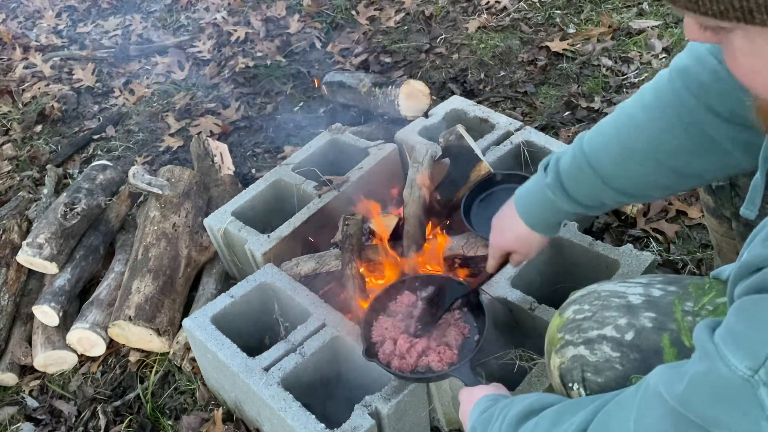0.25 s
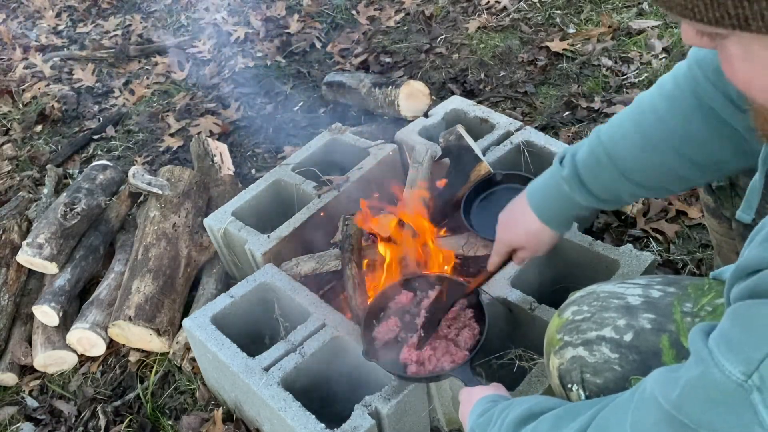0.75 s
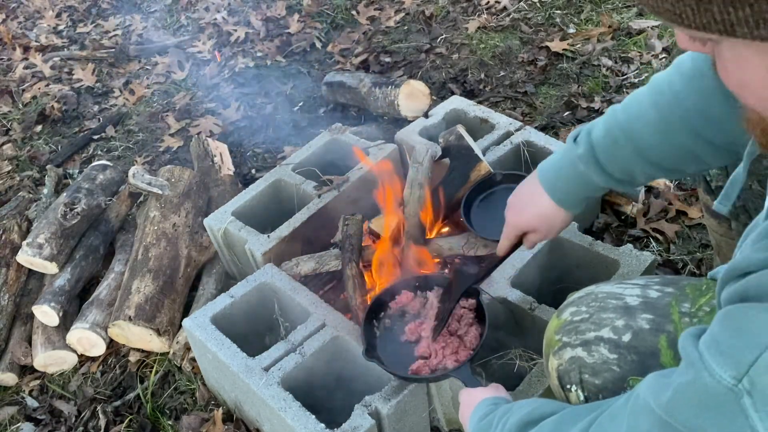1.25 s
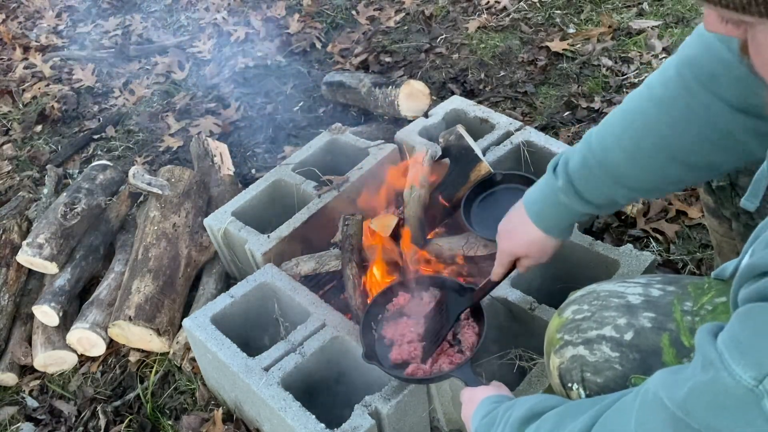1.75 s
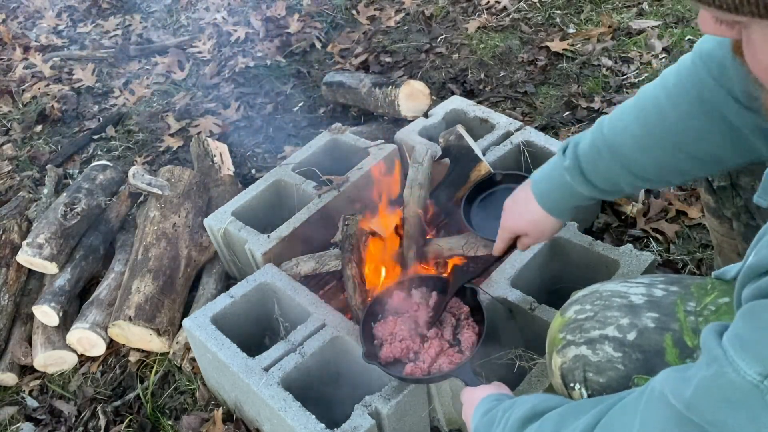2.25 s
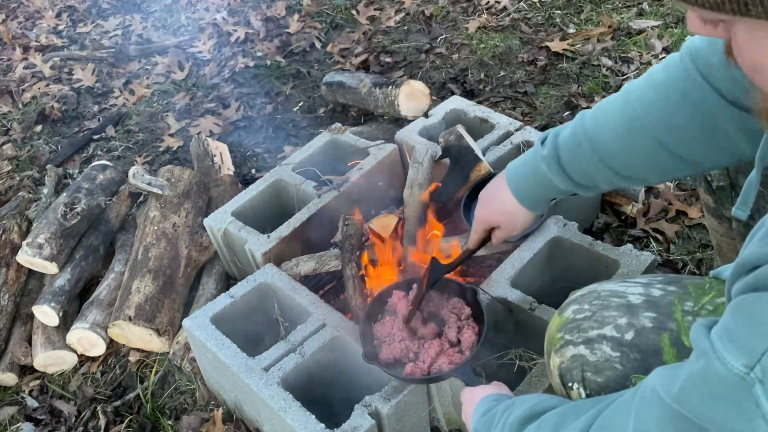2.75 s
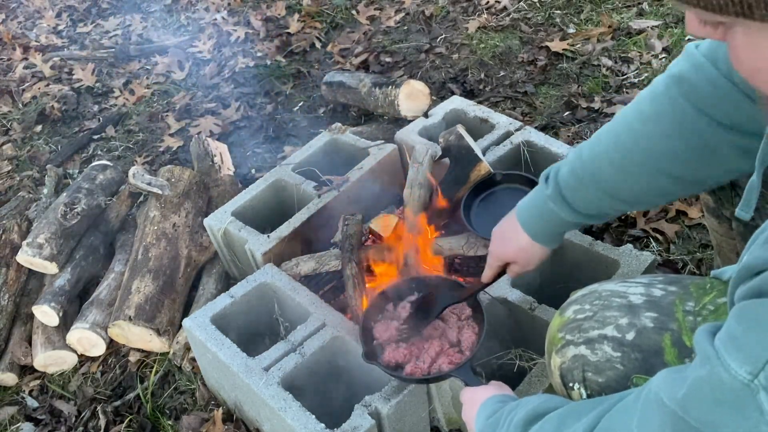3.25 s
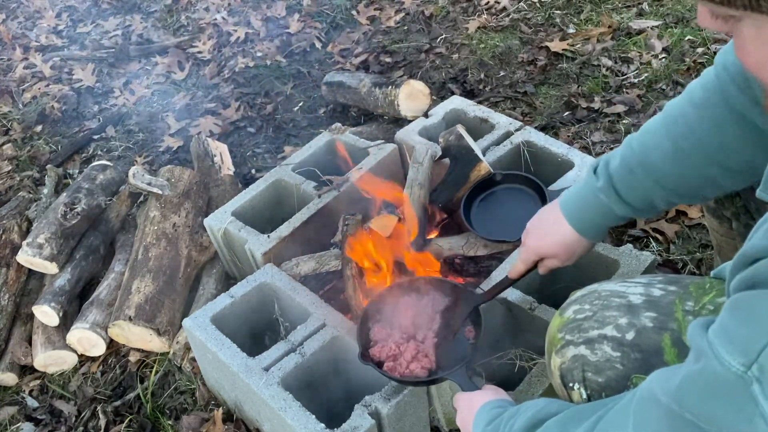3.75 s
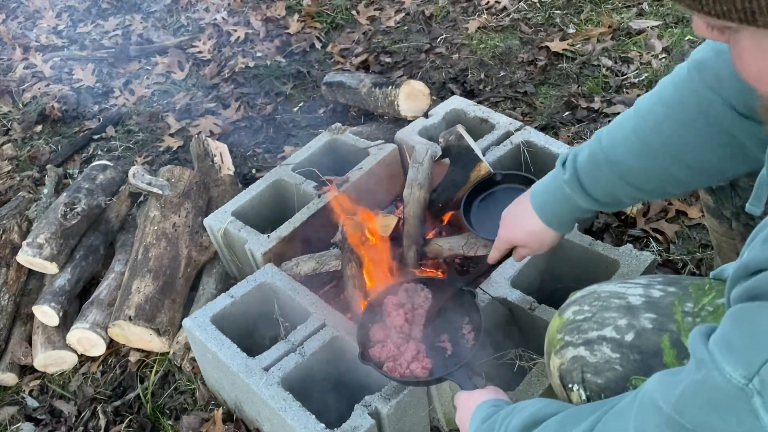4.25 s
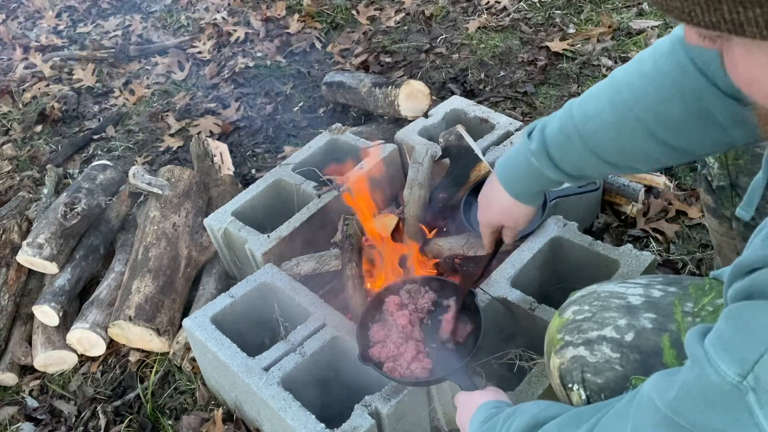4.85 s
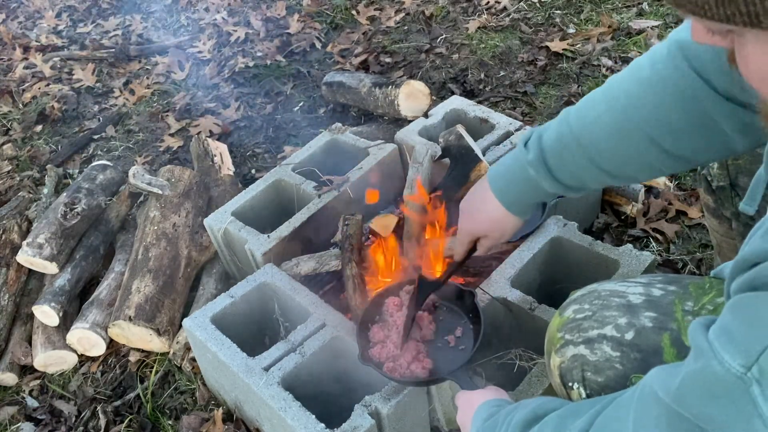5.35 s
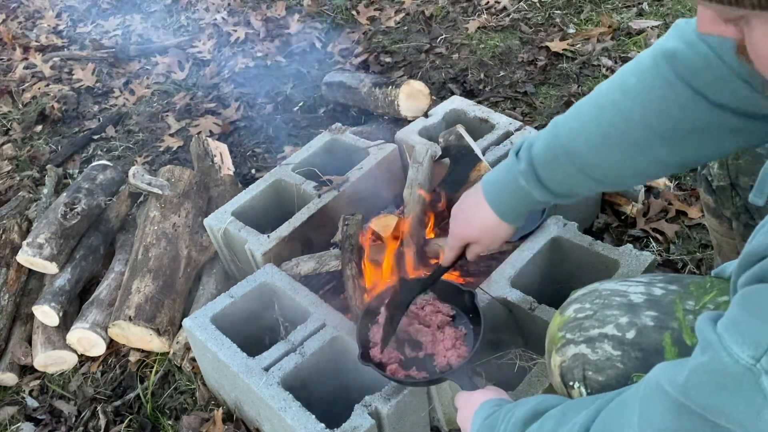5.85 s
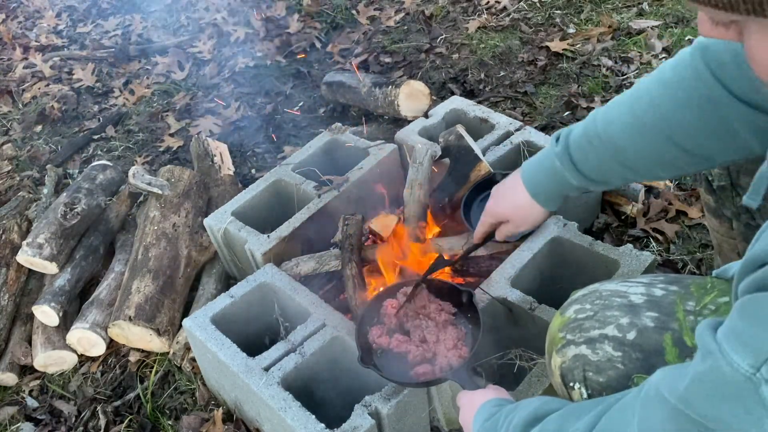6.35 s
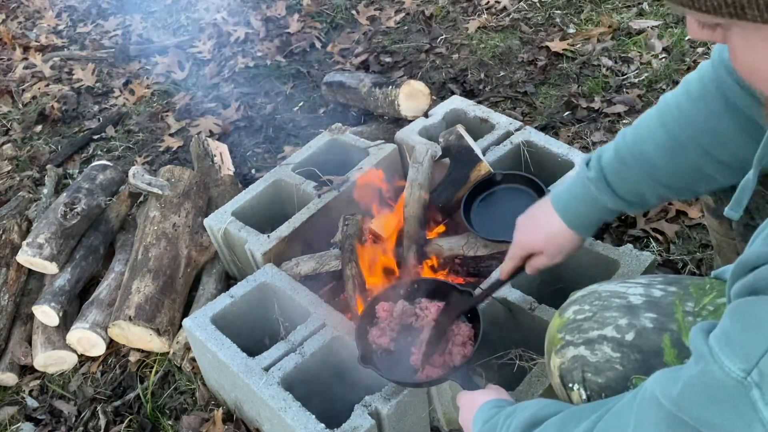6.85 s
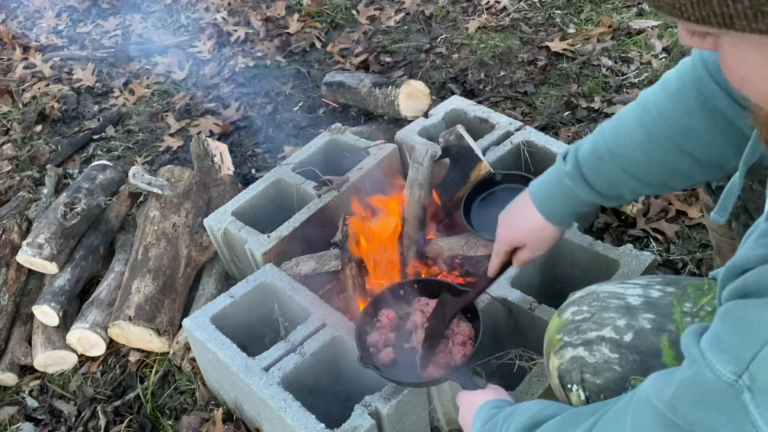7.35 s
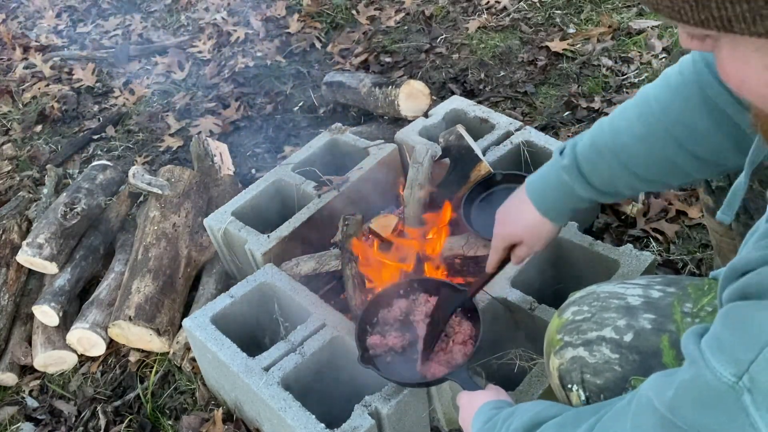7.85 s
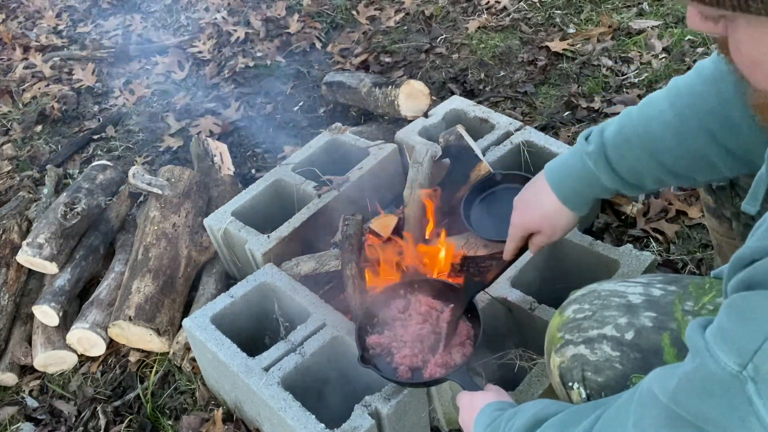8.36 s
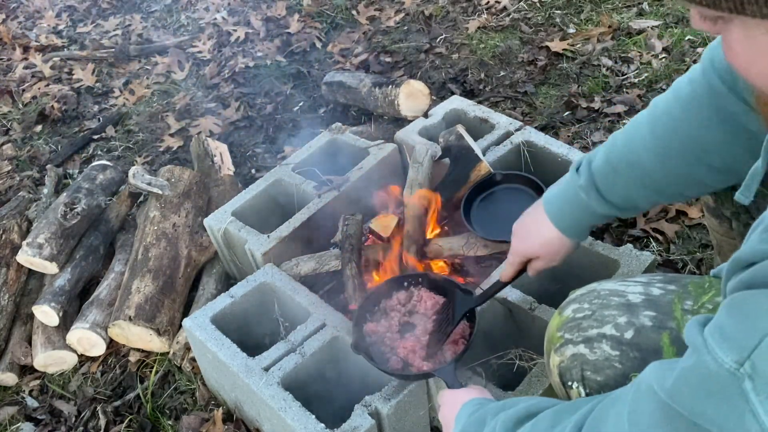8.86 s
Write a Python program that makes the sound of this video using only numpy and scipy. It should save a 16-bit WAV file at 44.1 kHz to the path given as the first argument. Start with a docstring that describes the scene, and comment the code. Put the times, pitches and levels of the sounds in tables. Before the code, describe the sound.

Close, bright frying hiss with crackling fat and bubbling juice, low fluttering flames, and a spatula knocking and scraping an iron pan outdoors.

```python
"""Ground meat fries in a cast iron skillet over a wood fire outdoors.
From the start juice bubbles, fat sizzles, sprays and crackles (shaped noise and random bursts) over the
rumble of flames; frying flares where fresh meat is pressed on hot iron. Fat spits and juice pockets spurt
while a spatula knocks and scrapes, shaking the damped modes of the pan, and midway squeaks once."""
import sys
import numpy as np
from scipy import signal
from scipy.fft import rfft, irfft, next_fast_len
from scipy.io import wavfile
from scipy.ndimage import map_coordinates

SR = 44100
rng = np.random.default_rng(int(sys.argv[2]) if len(sys.argv) > 2 else 0)


def generate_wav(sig):
    """Save sig (samples, or channels by samples) to the path in sys.argv[1] as 16-bit PCM at SR."""
    pcm = np.round(np.clip(np.atleast_2d(sig).T, -1, 1) * 32767).astype(np.int16)
    wavfile.write(sys.argv[1], SR, pcm)


N = 402191
TIME = np.arange(N) / SR
FFT_SIZE = next_fast_len(N + 4096)
BINS_HZ = np.maximum(np.fft.rfftfreq(FFT_SIZE, 1 / SR), 1)


def from_db(db):
    """Decibels to gain."""
    return 10 ** (np.asarray(db) / 20)


def rms_one(x):
    """Scale to unit rms."""
    return x / np.sqrt(np.mean(x ** 2) + 1e-20)


def in_time(rows):
    """Interpolate each column of a time curve, sample by sample."""
    s, *columns = np.transpose(rows)
    return [np.interp(TIME, s, column) for column in columns]


def at_bins(points):
    """Interpolate a table over log frequency, bin by bin."""
    hz, value = np.transpose(points)
    return np.interp(np.log(BINS_HZ), np.log(hz), value)


def filtered(x, response):
    """Apply a frequency response."""
    return irfft(rfft(x, FFT_SIZE) * response, FFT_SIZE)[..., :N]


def drift(corner_hz):
    """Slow random wander, rms 1."""
    return rms_one(filtered(rng.standard_normal(N), 1 / (1 + (BINS_HZ / corner_hz) ** 2)))


def spread(pair, colour):
    """Two unrelated signals become one coloured, slightly wide stereo source; rms 1."""
    # left-right likeness: (frequency [Hz], likeness [0-1])
    likeness = [(60, .99), (200, .97), (1000, .99), (2300, .98), (3000, .8), (5300, .72), (6500, .88),
                (7600, .72), (9000, .88), (15000, .86)]
    alike = np.clip(at_bins(likeness), 0, 1)
    mid, side = filtered(pair, from_db(at_bins(colour)) * np.sqrt([1 + alike, 1 - alike]))
    return rms_one(np.array([mid + side, mid - side]))


def bursts(per_s, size_db, limit):
    """Two trains of tiny random bursts, mostly small and a few large; rms 1."""
    born = rng.random((2, N)) < per_s / SR
    sizes = from_db(size_db * np.minimum(rng.exponential(1, (2, N)), limit))
    return rms_one(born * sizes * rng.choice([-1, 1], (2, N)))


def contact(force, low_hz, high_hz, order=2):
    """The band of force that a contact passes on."""
    edges_hz = np.clip([low_hz, max(high_hz, 1.2 * low_hz)], 20, .45 * SR)
    band = signal.butter(order, edges_hz, "band", fs=SR, output="sos")
    return signal.sosfilt(band, force + 1e-18)


def envelope(start_s, swell_s, hold_s, fade_s):
    """A smooth rise, a hold and an exponential fade; top 1."""
    t = TIME - start_s
    rise = np.sin(np.pi / 2 * np.clip(t / max(swell_s, 1e-3), 0, 1))
    return rise * np.exp(-np.clip((t - swell_s - hold_s) / fade_s, 0, 20))


def vigour():
    """Gains of juice, sizzle and spray: every flare adds its power to the simmer."""
    # steady frying: (time [s], juice level [dB], sizzle level [dB], spray level [dB])
    simmer = [(0, -50.5, -47.5, -44.5), (1.85, -52.5, -45, -46.5), (3.4, -51, -45.5, -43),
              (5.7, -53.5, -42.5, -39.5), (6.7, -53, -49.5, -47), (9.12, -54, -46.5, -45)]
    # fresh meat pressed onto the iron:
    # (start [s], swell [s], hold [s], sizzle level [dB], spray level [dB])
    flares = [(-.05, 0.018, 0.022, -43, -52), (0.1, 0.051, 0.089, -49.5, -53),
              (0.496, 0.13, 0.075, -55, -42.5), (0.898, 0.044, 0.38, -53, -44),
              (1.29, .08, .02, -47.5, -43.5), (1.44, 0.03, 0.051, -54, -43), (2.019, .04, .01, -41, -48),
              (2.11, 0.095, 0.088, -43.5, -42.5), (2.274, 0.17, 0.1, -42, -37.5),
              (2.625, 0.074, 0.16, -44, -55), (3.022, 0.056, 0.096, -44, -43.5),
              (3.186, 0.12, .25, -46, -37), (3.955, .03, .045, -42.5, -32.5), (4.05, .05, 0.1, -41, -30),
              (4.205, 0.066, 0.085, -40.5, -37.5), (4.497, 0.092, .2, -48.5, -44),
              (4.84, 0.3, .14, -44, -35), (5.272, 0.094, 0.13, -51, -40), (5.43, 0.11, 0.26, -41.5, -37),
              (5.84, 0.07, .1, -42, -36), (6.116, 0.24, 0.044, -40.5, -37), (6.404, .03, 0.05, -55, -41.5),
              (6.97, 0.064, 0.0068, -43.5, -45), (7.05, .04, 0.084, -50, -39.5), (7.2, 0.29, .04, -49, -40),
              (8.577, 0.035, 0.053, -46.5, -46.5), (8.808, .11, 0.034, -48, -38)]
    fade_s = 0.082
    wet_db, drying_db_per_s = -4, 2.5  # juice re sizzle; wanes as the water cooks off
    power = from_db(in_time(simmer)) ** 2
    for start_s, swell_s, hold_s, sizzle_db, spray_db in flares:
        juice_db = sizzle_db + wet_db - drying_db_per_s * start_s
        flare_power = from_db([juice_db, sizzle_db, spray_db]) ** 2
        power += np.outer(flare_power, envelope(start_s, swell_s, hold_s, fade_s) ** 2)
    return np.sqrt(power)


def fizz(per_s, count=9):
    """Tiny bursts dealt at random to bands, each ringing a few cycles at its band's pitch; rms 1."""
    train = bursts(per_s, size_db=3.0, limit=4.2)
    dealt = rng.integers(0, count, N)
    edges_hz = np.geomspace(1100, 15500, count + 1)
    return rms_one(sum(contact(train * (dealt == k), edges_hz[k], edges_hz[k + 1]) for k in range(count)))


def patches(x, patch_db, width_hz, last_s):
    """Spots of the pan flare up and dry out, each hissing in a band of its own."""
    hz, s, cells = signal.stft(x, SR, nperseg=512)
    grid = np.meshgrid(hz / width_hz, s / last_s, indexing="ij")
    chance = map_coordinates(rng.standard_normal((128, 512)), grid, mode="mirror")
    return signal.istft(cells * from_db(patch_db * chance), SR)[1][..., :N]


def frying(sputter_db, sputter_hz):
    """Steam bursts through fat by the thousand; the stronger the spray, the more large bursts stand out."""
    # colours: (frequency [Hz], density [dB per Hz])
    juice_colour = [(200, -31), (400, -20.5), (600, -12.5), (740, -10.5), (1000, -9), (1300, -3.5),
                    (1950, -0.26), (2320, -6), (2570, -2.5), (2850, -8.5), (3600, -28), (5000, -49)]
    sizzle_colour = [(1200, -31), (2300, -13), (2850, -5.5), (3300, -1), (4600, 1.05), (5600, -2.5),
                     (6900, -2.6), (8000, -9.5), (9500, -10), (14000, -14)]
    spray_colour = [(4500, -35), (7200, -13), (8300, -2.5), (9400, .5), (10500, 0), (11400, -2),
                    (13000, -1.3), (14500, -4.8), (15700, -4.8)]
    juice_gain, sizzle_gain, spray_gain = vigour() * from_db(sputter_db * drift(sputter_hz))
    fierce = np.clip(0.6 + 0.011 * (20 * np.log10(spray_gain) + 41), .15, .95)

    coarse = fizz(per_s=22000)
    large = np.sqrt(fierce) * bursts(5000, size_db=3.0, limit=4.8)
    fine = large + np.sqrt(1 - fierce) * rng.standard_normal((2, N))
    fat = patches(coarse + .3 * fine, patch_db=2.0, width_hz=350, last_s=.03)
    mist = patches(fine + 0.18 * coarse, patch_db=2.05, width_hz=596, last_s=.06)
    bubbles = patches(bursts(6000, size_db=3.0, limit=4.6), patch_db=1.7, width_hz=221, last_s=.04)

    sizzle = sizzle_gain * from_db(0.42 * drift(21)) * spread(fat, sizzle_colour)
    spray = spray_gain * from_db(1.0 * drift(27)) * spread(mist, spray_colour)
    juice = juice_gain * from_db(0.42 * drift(30)) * spread(bubbles, juice_colour)
    return sizzle + spray + juice


def crackle(per_s, level_db):
    """Small drops of fat pop out of the hiss, as strongly as the pan is spraying."""
    # colour: (frequency [Hz], density [dB per Hz])
    pop_colour = [(500, -30), (1200, -10), (2800, -4), (4500, -4), (7000, -4), (8300, -9), (10000, 3),
                  (15000, -3)]
    _, _, spray_gain = vigour()
    pops = bursts(per_s, size_db=3.5, limit=3.2)
    return from_db(level_db) * spray_gain * spread(pops, pop_colour)


def flames(flutter_db):
    """Burning gas billows in a low rumble that flutters as the flames lick."""
    # rumble strength: (time [s], level [dB])
    fire_level = [(0, -49), (1.8, -51.5), (3.2, -52), (4.1, -51), (5.8, -52.5), (7.3, -52.5), (8.3, -53),
                  (9.12, -50)]
    # colour: (frequency [Hz], density [dB per Hz])
    rumble_colour = [(15, -38), (30, -20), (42, -8.5), (54, -1.5), (70, -0.5), (100, -5), (150, -13.5),
                     (220, -19), (330, -30.5), (600, -45), (2000, -75)]
    level_db, = in_time(fire_level)
    gas = rng.standard_normal((2, N)) * from_db(flutter_db * drift(15))
    return from_db(level_db) * spread(gas, rumble_colour)


def spits():
    """A bursting drop of fat is one sharp, bright snap of noise, over in about a millisecond."""
    # bursting drops: (time [s], peak level [dB])
    drops = [(0.0425, -27), (.311, -28), (.686, -25), (1.378, -26), (2.4965, -15), (2.5353, -18),
             (2.9294, -26), (3.158, -23), (3.2906, -17), (3.318, -20), (4.1708, -18), (5.4635, -22),
             (5.9283, -11.8), (5.9935, -21), (6.4966, -24), (6.5173, -23), (7.1226, -20), (7.144, -23),
             (7.638, -28)]
    out, t = np.zeros(N), TIME[:SR // 50]
    for s, peak_db in drops:
        snap = contact(rng.standard_normal(len(t)) * np.exp(-t / .0004), 7500, 13500)
        at = round(s * SR)
        out[at:at + len(t)] += from_db(peak_db) * snap / np.abs(snap).max()
    return out


def spurts():
    """A pocket of juice boils off in a dense run of bubbles, each pocket at its own pitch."""
    # juice meeting hot iron: (start [s], hold [s], centre [Hz], level [dB])
    pockets = [(0.236, .012, 4400, -46), (2.047, 0.011, 1600, -51), (2.13, .06, 1660, -49.5),
               (2.19, 0.023, 4700, -45), (2.407, 0.11, 6800, -43.5), (2.535, 0.042, 2000, -46.5),
               (2.67, .2, 4600, -47), (2.69, .04, 7000, -47), (2.85, .025, 6800, -46),
               (3.058, 0.055, 3500, -53), (3.958, .02, 5000, -43), (3.977, 0.098, 1740, -43),
               (3.995, .03, 7000, -42), (4.0, .07, 1410, -45), (4.102, .16, 1800, -51.5),
               (4.19, .1, 6500, -45), (5.49, .07, 7150, -41), (5.597, .17, 3750, -48.5),
               (5.88, .025, 7000, -41.5), (6.388, 0.0091, 1900, -53), (6.548, 0.0074, 3860, -44),
               (6.62, .3, 3700, -53), (7.02, 0.027, 5200, -48), (7.63, .015, 4700, -45),
               (8.04, .008, 6450, -50), (8.078, 0.3, 3580, -52)]
    swell_s, fade_s, width_octaves = 0.011, 0.013, .42
    half_band = 2 ** (width_octaves / 2)
    out, boiling = np.zeros(N), bursts(4000, size_db=3.0, limit=4.0)[0]
    for start_s, hold_s, hz, db in pockets:
        at = round(start_s * SR)
        span = slice(at, at + SR // 2)
        boil = rms_one(contact(boiling[span], hz / half_band, hz * half_band))
        out[span] += from_db(db) * boil * envelope(start_s, swell_s, hold_s, fade_s)[span]
    return out


def resonance(force, hz, width_hz):
    """One ringing mode; gain about 1 at its centre."""
    r = np.exp(-np.pi * width_hz / SR)
    return signal.lfilter([1 - r, 0, r - 1], [1, -2 * r * np.cos(2 * np.pi * hz / SR), r * r], force)


def skillet(force, damping, vary_db):
    """The pan's modes, damped by the meat; each one's strength varies with where the pan is touched."""
    # loaded pan: (mode [Hz], width at damping 1 [Hz], mean level [dB])
    modes = [(205, 60, -12.5), (336, 79, -3), (430, 27, 0), (480, 53, -3.5), (610, 45, -4), (660, 45, -4),
             (751, 53, -4), (820, 70, -5), (950, 27, 3), (1028, 27, -2.5), (1317, 60, -12), (1415, 40, -18),
             (1667, 32, -7.5), (2170, 32, -15), (2570, 24, -2), (3915, 60, -4.5), (4430, 67, -8),
             (5080, 45, -8)]
    luck = rng.standard_normal(len(modes))
    out = 0
    for k, (hz, width_hz, db) in enumerate(modes):
        mode = resonance(force, hz, width_hz * damping)
        out = out + (-1) ** k * from_db(db + vary_db * luck[k]) * mode
    return out


def knocks(thud_s, rebound_s, rebound_db, pan_db, ring_cycles):
    """A short thud and a weaker rebound; the pan answers and the pressed blade rings briefly."""
    # spatula knocks or its edge catches:
    # (time [s], peak level [dB], thud [Hz], blade ring [Hz], blade re thud [dB])
    hits = [(.516, -50, 620, 620, -12), (.923, -48, 480, 400, -13), (1.282, -33, 680, 940, -11),
            (1.302, -36, 780, 510, -12), (1.474, -48, 600, 600, -14), (3.285, -35, 800, 950, -12),
            (3.313, -33, 700, 950, -12), (3.332, -31, 600, 330, -9), (3.401, -32, 780, 950, -10),
            (3.426, -29, 746, 315, -8.5), (3.455, -26.5, 900, 962, -3), (3.613, -36, 850, 934, -2),
            (3.62, -30, 500, 430, -8), (3.643, -34, 850, 640, -12), (3.652, -32, 820, 945, -6),
            (4.427, -48, 720, 670, -4), (4.521, -42, 890, 890, 3), (4.566, -39, 1290, 1290, 0),
            (4.94, -39, 560, 704, -14), (4.948, -23.5, 790, 406, -12), (5.304, -31.5, 740, 610, -14),
            (5.675, -39.5, 620, 600, -9.5), (5.887, -44, 700, 700, -12), (6.19, -44.5, 480, 480, -14),
            (6.202, -39, 760, 935, -9), (7.951, -32, 455, 418, -13), (7.957, -26.5, 830, 820, -5),
            (8.617, -31, 700, 423, -6), (8.639, -28, 700, 385, -8), (8.654, -24.5, 780, 390, -7),
            (8.736, -31, 850, 950, -7), (8.858, -43, 580, 480, -8), (9.024, -26.5, 760, 800, -8),
            (9.045, -27, 820, 940, -7)]
    out, lead = np.zeros(N + SR), SR // 200  # the thud starts ahead of its centre
    t = TIME[:SR // 4] - lead / SR
    for s, peak_db, thud_hz, blade_hz, blade_db in hits:
        late = t - rebound_s * rng.uniform(0.806, 1.197)
        thud, rebound = (np.sin(2 * np.pi * thud_hz * u) * np.exp(-(u / thud_s) ** 2) for u in (t, late))
        force = thud + from_db(rebound_db) * rebound
        pan = skillet(force, damping=1.0, vary_db=3.0)
        ring_fade = np.exp(-t * blade_hz / ring_cycles) * np.clip(t / thud_s, 0, 1)
        blade = np.sin(2 * np.pi * blade_hz * t) * ring_fade
        sound = force + from_db(pan_db) * pan / np.abs(pan).max() + from_db(blade_db) * blade
        at = round(s * SR) - lead
        out[at:at + len(t)] += from_db(peak_db) * sound / np.abs(sound).max()
    return out[:N]


def scrapes(slips_per_s, grit, swell, jitter):
    """The blade sticks and slips unevenly across the iron, shaking the pan, with a juddering tone."""
    # spatula strokes, some layered from several bands, and one wet squelch:
    # (start [s], strongest [s], end [s], level [dB], friction low [Hz],
    # friction high [Hz], first judder [Hz], last judder [Hz], judder re pan [dB])
    layers = [(1.211, 1.25, 1.32, -53, 250, 900, 450, 450, -10),
              (1.255, 1.3, 1.325, -46.5, 250, 950, 510, 400, -9),
              (3.235, 3.305, 3.38, -42.5, 230, 990, 740, 640, -9),
              (3.392, 3.44, 3.5, -36, 240, 1100, 880, 981, -4),
              (3.6, 3.62, 3.65, -41, 280, 1000, 480, 400, -9),
              (3.939, 4.006, 4.14, -54, 550, 1500, 720, 720, -8),
              (4.536, 4.577, 4.58, -45.5, 600, 1700, 655, 675, 0.5),
              (4.971, 4.998, 5.02, -46, 640, 1900, 1200, 1100, -8),
              (8.597, 8.643, 8.69, -35, 300, 1700, 670, 560, -10),
              (8.608, 8.655, 8.7, -40.5, 1250, 2000, 1685, 1660, -3),
              (8.638, 8.646, 8.7, -39, 2000, 3600, 2600, 2575, -6),
              (8.668, 8.692, 8.735, -32.5, 300, 1200, 935, 966, -3.5),
              (8.636, 8.682, 8.73, -47.5, 3600, 4800, 3930, 3930, -8),
              (8.712, 8.735, 8.775, -47, 250, 1100, 400, 380, -6),
              (8.862, 8.91, 9.05, -42.5, 260, 1500, 990, 940, -8),
              (8.995, 9.026, 9.2, -35.5, 313, 1180, 780, 863, -8),
              (9.009, 9.06, 9.25, -50, 1500, 5000, 3920, 3930, -8),
              (9.04, 9.09, 9.2, -41.5, 280, 2600, 453, 430, -6.5)]
    out, t = np.zeros(N + SR), TIME[:SR // 3]
    for start_s, peak_s, end_s, db, low_hz, high_hz, first_hz, last_hz, judder_db in layers:
        push = np.sin(np.pi / 2 * np.interp(start_s + t, [start_s, peak_s, end_s], [0, 1, 0])) ** swell
        slips = (rng.random(len(t)) < slips_per_s / SR) * rng.uniform(0.4, 1, len(t))
        slips = slips + grit * rng.standard_normal(len(t))
        force = contact(slips * push, low_hz, high_hz)
        uneven = jitter * rms_one(contact(rng.standard_normal(len(t)), 25, 250))
        hz = np.interp(start_s + t, [start_s, end_s], [first_hz, last_hz]) * (1 + uneven)
        judder = from_db(judder_db) * rms_one(push * np.sin(2 * np.pi * np.cumsum(hz) / SR))
        sound = rms_one(skillet(force, damping=0.91, vary_db=1.0)) + judder
        at = round(start_s * SR)
        # energy follows the push
        out[at:at + len(t)] += from_db(db) * sound * np.sqrt(np.sum(push ** 2) / np.sum(sound ** 2))
    return out[:N]


def squeak(jitter):
    """The blade squeaks on bare iron: a sinking tone, a rasp of randomly skipped cycles, an overtone."""
    at_s, start_hz, end_hz, sag_s = 4.538, 1010, 831, .014
    tone_db, rasp_db, overtone_db = -36.5, -44, -37
    hz = end_hz + (start_hz - end_hz) * np.exp(-np.maximum(TIME - at_s, 0) / sag_s)
    cycles = np.cumsum(hz * (1 + jitter * drift(300))) / SR
    skips = np.diff(cycles // 1, prepend=0) * (rng.random(N) < .3) + .02 * rng.standard_normal(N)
    tone = np.sin(2 * np.pi * cycles) * envelope(at_s, swell_s=.006, hold_s=.008, fade_s=0.021)
    rasp = rms_one(contact(skips, 940, 1650, order=4))
    rasp = rasp * envelope(at_s, swell_s=.014, hold_s=0.042, fade_s=.008)
    # swells as it meets a mode of the pan
    overtone = np.sin(4 * np.pi * cycles) * envelope(at_s, swell_s=0.036, hold_s=.002, fade_s=.035) ** 2
    return from_db(tone_db) * tone + from_db(rasp_db) * rasp + from_db(overtone_db) * overtone


def fire_pit(x, echo_db, decay_s):
    """The concrete blocks around the fire scatter a short tail, different on each side."""
    t = TIME[:SR // 8]
    tail = rng.standard_normal((2, len(t))) * np.exp(-t / decay_s) * (t > .003)
    echo = signal.fftconvolve(x[None], tail / np.linalg.norm(tail[0]), axes=1)[:, :N]
    return x + from_db(echo_db) * echo


def scene():
    """Pan and fire, close by in the open air."""
    fat = frying(sputter_db=.5, sputter_hz=13) + crackle(per_s=90, level_db=-13.5)
    fire = flames(flutter_db=2.2)
    drops = spits() + spurts()
    spatula = knocks(thud_s=.0011, rebound_s=.0062, rebound_db=-11, pan_db=-8, ring_cycles=6.5)
    spatula = spatula + scrapes(slips_per_s=500, grit=0.036, swell=1.16, jitter=.02) + squeak(jitter=0.02)
    balance = from_db([[.65], [-.65]])  # slightly left
    handling = fire_pit(spatula, echo_db=-19.5, decay_s=0.027) * balance
    return fat + fire + drops + handling


def record(dry):
    """Two microphone ports hear the treble out of step; the top is cut steeply."""
    # left ahead of right: (frequency [Hz], phase [rad])
    port_phase = [(2550, 0), (3000, .95), (5500, .75), (7100, 0), (8050, -2.7), (8600, -3.5), (9750, -6.1),
                  (10400, -6.4), (11500, -9.1), (12400, -9.6), (13700, -12.4), (14600, -13), (15150, -15.4),
                  (15700, -15.7)]
    cutoff_hz = 15750
    lead_rad = np.interp(BINS_HZ, *np.transpose(port_phase))
    low_pass = 1 / np.sqrt(1 + (BINS_HZ / cutoff_hz) ** 300)
    return filtered(dry, np.exp(1j * lead_rad * np.array([[.5], [-.5]])) * low_pass)


dry = scene()
out = record(dry)
generate_wav(out)
```